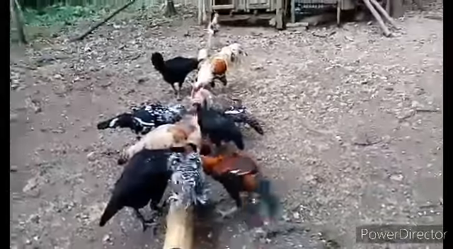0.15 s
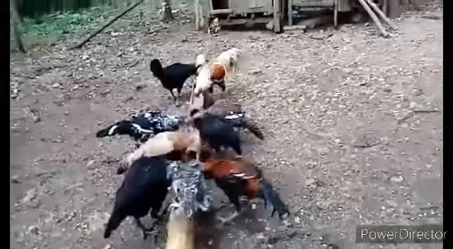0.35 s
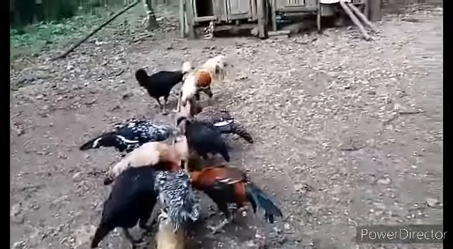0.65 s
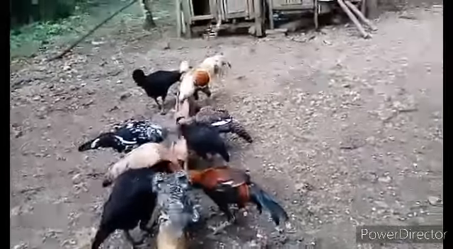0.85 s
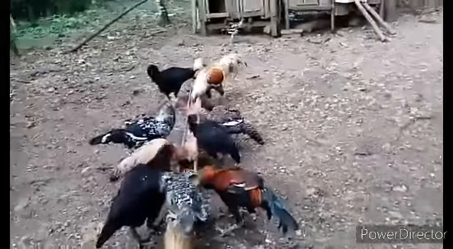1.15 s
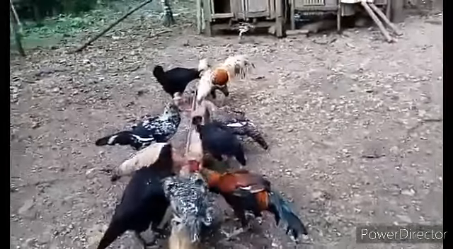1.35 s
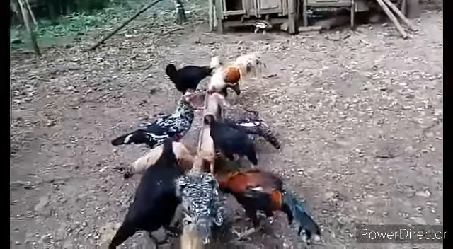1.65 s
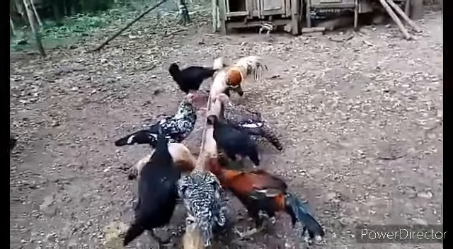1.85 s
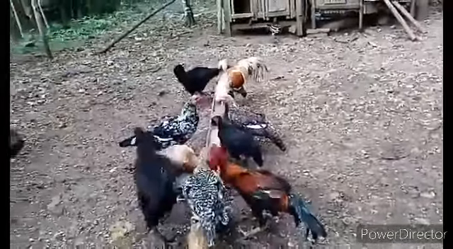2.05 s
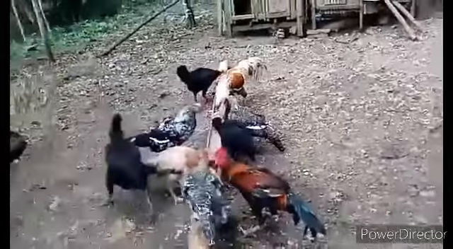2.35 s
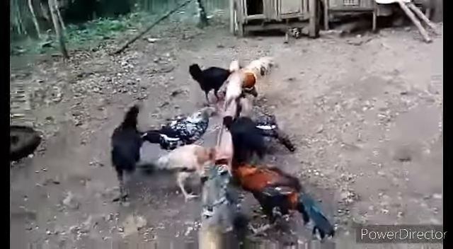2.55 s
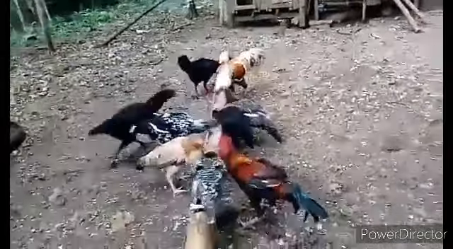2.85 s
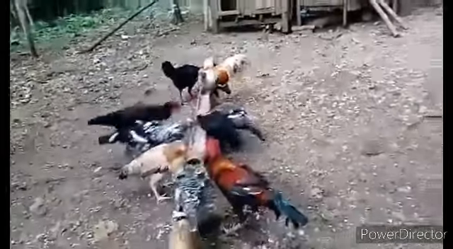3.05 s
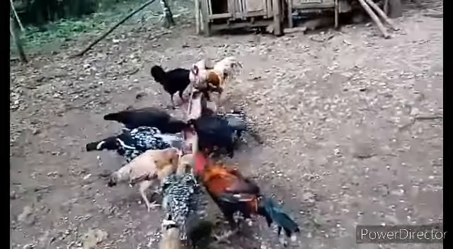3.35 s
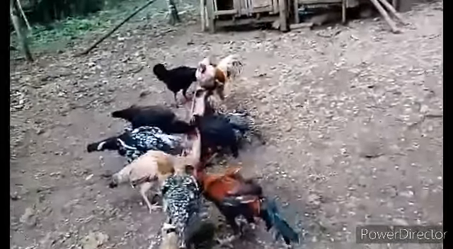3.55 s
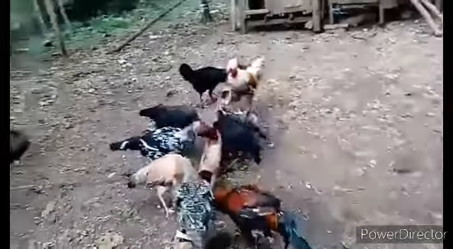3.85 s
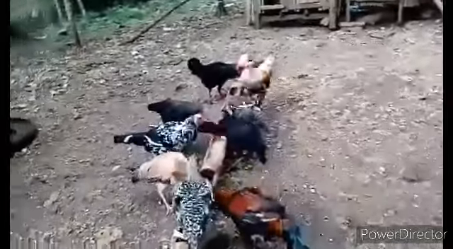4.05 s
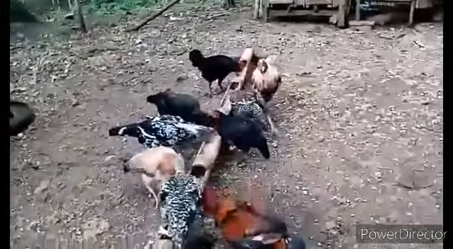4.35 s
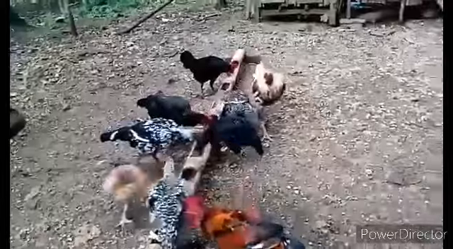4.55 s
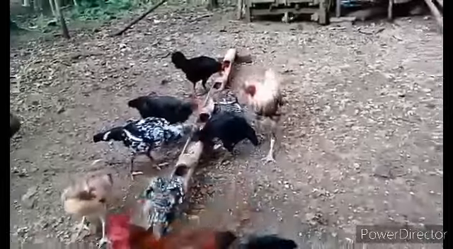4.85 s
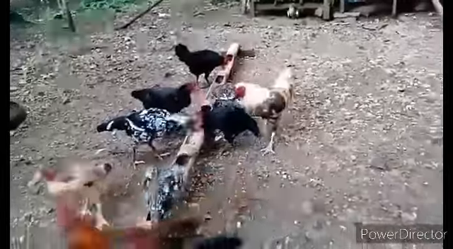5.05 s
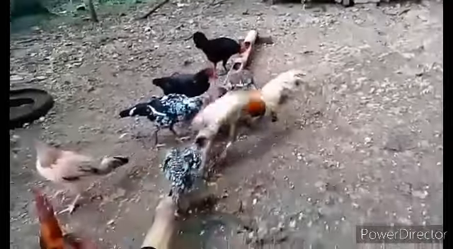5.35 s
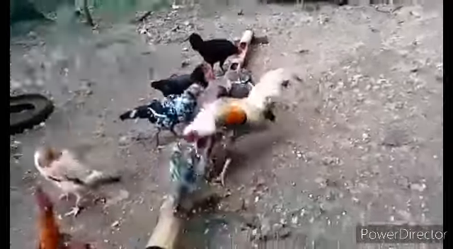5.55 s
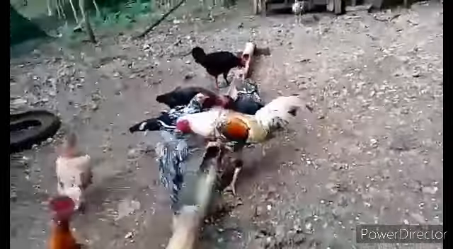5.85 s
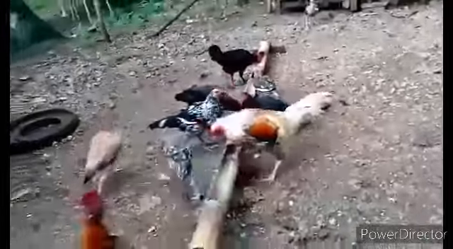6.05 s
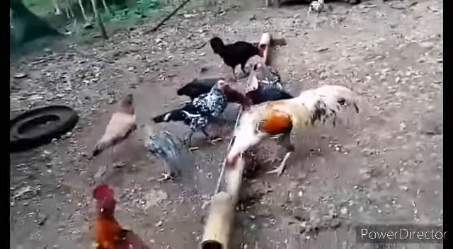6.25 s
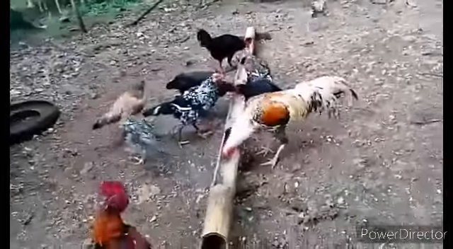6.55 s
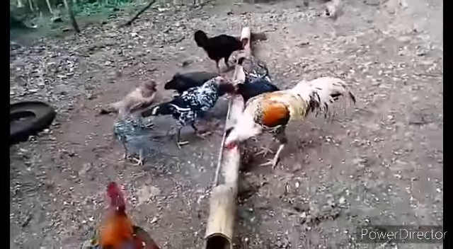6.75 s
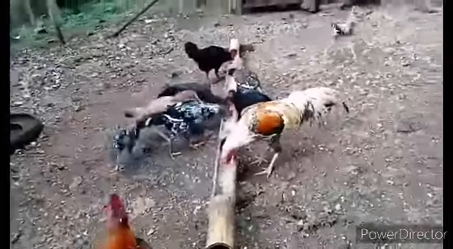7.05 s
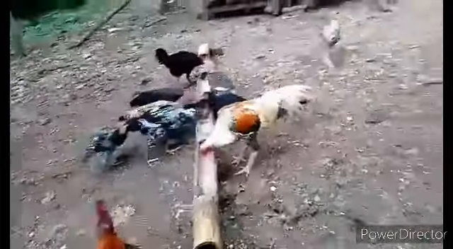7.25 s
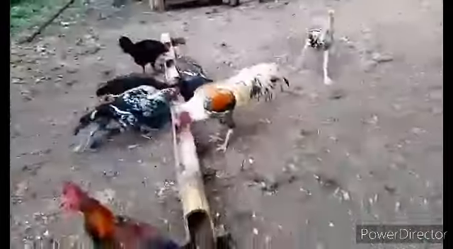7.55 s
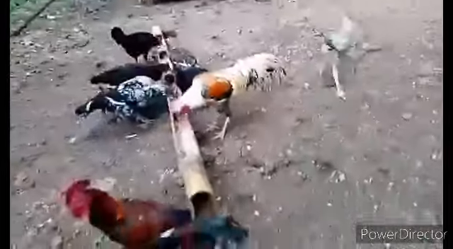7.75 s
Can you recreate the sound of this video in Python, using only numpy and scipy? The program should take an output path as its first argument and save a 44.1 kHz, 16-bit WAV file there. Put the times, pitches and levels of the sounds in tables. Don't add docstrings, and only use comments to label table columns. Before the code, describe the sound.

Irregular beak taps ring a bamboo tube in an open yard over a faint engine hum, with scattered kernels and a brief squawk late on.

```python
import sys
import numpy as np
from scipy import signal
from scipy.fft import rfft, irfft
from scipy.io import wavfile
from scipy.ndimage import uniform_filter1d

SR = 44100
rng = np.random.default_rng(int(sys.argv[2]) if len(sys.argv) > 2 else 0)


def unload_audio(sound):
    columns = np.transpose(np.atleast_2d(sound))
    steps = np.round(np.clip(columns, -1, 1) * 32767)
    wavfile.write(sys.argv[1], SR, steps.astype(np.int16))


def ratio_of_db(decibels):
    return 10 ** (np.asarray(decibels, float) / 20)


N = 347949
LEAD = 47
RIGHT_DB = 7.5


def evened(x):
    return x / np.sqrt(np.mean(x ** 2) + 1e-20)


def smooth(x, *sizes):
    for size in sizes:
        x = uniform_filter1d(x, size=size)
    return x


def read(points, hz):
    f, value = np.transpose(points)
    return np.interp(np.log(hz + 1), np.log(f + 1), value)


def add(mix, s, pair):
    for side, early in ((0, LEAD), (1, 0)):
        start = max(round(s * SR) - early, 0)
        part = mix[side, start:][:pair.shape[1]]
        part += pair[side, :len(part)]


# (frequency [Hz], level [dB])
AWAY_PORT = [(60, -10), (120, 4), (230, -8.5), (440, -6.5), (860, -6.5), (1680, -10), (3270, -15),
             (6370, -0.5), (12400, -3)]


def shade(x):
    hz = np.fft.rfftfreq(x.shape[-1], 1 / SR)
    return irfft(rfft(x) * ratio_of_db(read(AWAY_PORT, hz)), x.shape[-1])


# (frequency [Hz], likeness [0-1])
PORT_LIKENESS = [(100, 0.91), (500, 0.78), (1200, 0.14), (5000, 0.02)]


def wash(spectrum, patchy_db, flicker_db):
    frames, hz = N // 128 + 5, np.fft.rfftfreq(512, 1 / SR)
    a, b, c, d, patches = rng.standard_normal((frames, 257, 5)).T
    flicker = uniform_filter1d(patches[::-1], size=60, axis=0)
    flicker = evened(uniform_filter1d(flicker, size=3, axis=1))
    patches = uniform_filter1d(patches, size=6, axis=0)
    patches = evened(uniform_filter1d(patches, size=16, axis=1))

    same = np.clip(read(PORT_LIKENESS, hz), -1, 1)[:, None]
    right = a + 1j * b
    early = np.exp(2j * np.pi * hz * LEAD / SR)[:, None]
    left = same * right * early + np.sqrt(1 - same ** 2) * (c + 1j * d)
    left = left * ratio_of_db(read(AWAY_PORT, hz))[:, None]
    field_db = read(spectrum, hz)[:, None] + patchy_db * patches + flicker_db * flicker
    pair = signal.istft(np.array([left, right]) * ratio_of_db(field_db), nperseg=512, noverlap=384)[1]
    return pair[:, :N] / np.std(pair[1])


# (frequency [Hz], level [dB per Hz])
INSECT_WHINE = [(10500, -60), (11080, -15), (11340, 0.5), (11600, -10), (11900, -60)]


def insects():
    return ratio_of_db(-82.5 + RIGHT_DB) * wash(INSECT_WHINE, 2.0, 0.6)


# (multiple of 30.8 Hz, level [dB])
ENGINE_ORDERS = [(2, -90), (3, -82), (4, -71.5), (5, -75), (6, -78)]
# (frequency [Hz], level [dB per Hz])
ENGINE_RUMBLE = [(12, -62), (20, -33), (27, -31), (48, -23), (91, 12.5), (113, -1), (163, 12), (209, 25),
                 (300, -13), (390, -30), (660, -120)]
# (time [s], level [dB])
AIR_CARRY = [(0.0, -65.5), (0.81, -69), (1.08, -65.5), (1.89, -66), (2.15, -70.5), (3.38, -67),
             (3.76, -75.5), (4.02, -65), (4.37, -72), (5.07, -66.5), (5.78, -71.5), (5.91, -74.5),
             (7.01, -69.5), (7.36, -72.5), (7.69, -70), (7.89, -74.5)]


def engine():
    engine_hz, rumble_db, usual_carry_db = 30.8, -68, -67
    drift = evened(smooth(rng.standard_normal((N, 10)).T, 4000, 4000))
    k, db = np.transpose(ENGINE_ORDERS)[..., None]
    turns = np.cumsum(k * engine_hz * (1 + 0.017 * drift[:5]), 1) / SR
    hum = (ratio_of_db(db + 5.0 + 3.5 * drift[5:]) * np.sin(2 * np.pi * turns)).sum(0)
    rumble = wash(ENGINE_RUMBLE, 5.0, 1.4)
    carry_db = np.interp(np.arange(N) / SR, *np.transpose(AIR_CARRY)) - usual_carry_db
    return ratio_of_db(carry_db) * (ratio_of_db([[-4.0], [2.5]]) * hum + ratio_of_db(rumble_db) * rumble)


# (time [s], level [dB])
FLOCK_STIR = [(0.0, -67), (1.21, -68), (1.6, -71), (2.7, -64.5), (3.47, -69.5), (3.91, -65.5),
              (4.28, -73.5), (5.05, -62.5), (5.34, -69.5), (5.71, -57), (5.96, -71), (6.31, -70),
              (6.62, -68.5), (6.74, -84), (6.95, -66.5), (7.38, -72), (7.76, -63.5), (7.89, -67.5)]
# (frequency [Hz], level [dB per Hz])
FEATHER_RUSTLE = [(290, -70), (500, 2), (648, -8), (859, 1), (1200, -6), (1620, -2.5), (2990, 0.5),
                  (4720, -10.5), (5580, -8.5), (6000, -26), (7800, -48), (13200, -120)]
# (frequency [Hz], level [dB per Hz])
FOOT_SCUFF = [(110, -46), (180, 11), (247, 0.5), (349, 0), (800, -6), (1040, -52), (1760, -120)]
# (frequency [Hz], level [dB per Hz])
HUSK_HISS = [(2350, 5), (4000, 1.5), (5730, 5.5), (7030, -2), (8320, 0), (9500, -3), (10300, -8),
             (11000, 3.5), (11500, -34), (12200, -47), (15900, -62), (22000, -120)]
# (usual level [dB], rise [dB per dB of stir])
STIR_FOLLOW = [(-68, 0.84), (-77, 1), (-71.5, 0.19)]


def stir_db(s):
    return np.interp(s, *np.transpose(FLOCK_STIR)) + 68


def shuffle():
    stir = stir_db(np.arange(N) / SR)
    layers = wash(FEATHER_RUSTLE, 3.8, 2.5), wash(FOOT_SCUFF, 4.6, 3.6), wash(HUSK_HISS, 2.5, 1.2)
    return sum(ratio_of_db(db + slope * stir + RIGHT_DB) * x for (db, slope), x in zip(STIR_FOLLOW, layers))


# (time [s], length [s], level
# [dB], first pitch [Hz], last pitch [Hz])
SHORT_CALLS = [(0.858, 0.072, -80, 1780, 1850), (1.381, 0.03, -60.5, 1084, 1090),
               (1.423, 0.043, -67, 1126, 1090), (1.39, 0.089, -69.5, 852, 820),
               (2.456, 0.053, -58, 482, 557), (3.075, 0.028, -59.5, 602, 564),
               (3.36, 0.038, -56.5, 447, 498), (3.516, 0.054, -62.5, 423, 556),
               (3.23, 0.076, -71.5, 700, 715), (3.647, 0.028, -62, 525, 500),
               (3.795, 0.044, -55.5, 298, 431), (3.798, 0.082, -63, 646, 704),
               (5.111, 0.033, -59.5, 412, 423), (5.17, 0.027, -60, 406, 410),
               (5.329, 0.022, -55.5, 1620, 1566), (7.66, 0.026, -45, 1200, 1630),
               (7.694, 0.014, -47.5, 1500, 1525), (7.675, 0.035, -47, 1134, 1147),
               (7.693, 0.028, -51.5, 1130, 1040), (7.739, 0.012, -61.5, 1000, 1000)]


def clucks():
    octave_db = -13.5
    out = np.zeros((2, N))
    flutters = rng.standard_normal((len(SHORT_CALLS), 2, 5000))
    for (s, length, db, first_hz, last_hz), flutter in zip(SHORT_CALLS, flutters):
        u = np.linspace(0, 1, round(length * SR))
        wobble, tremble = evened(smooth(flutter, 200))[:, :len(u)]
        hz = first_hz + (last_hz - first_hz) * np.sin(np.pi * u / 2)
        turns = np.cumsum(hz * (1 + .022 * wobble)) / SR
        tone = np.sin(2 * np.pi * turns) + ratio_of_db(octave_db) * np.sin(4 * np.pi * turns)
        swell = ratio_of_db(db - 1.0 + RIGHT_DB + 2.54 * tremble) * np.sin(np.pi * u) ** 0.4
        add(out, s, swell * tone * ratio_of_db([[-6.0], [0]]))
    return out


def voice(s, effort_db, hz, rough, mouth, shut, wide):
    t = np.arange(s[0], s[-1], 1 / SR)
    effort_db, hz, rough, mouth = (np.interp(t, s, c) for c in (effort_db, hz, rough, mouth))
    rough, mouth = np.clip(rough, 0, 1), np.clip(mouth, 0, 1)
    wobble, air, other, *trembles = rng.standard_normal((len(t), 17)).T
    turns = np.cumsum(hz * (1 + 0.017 * evened(smooth(wobble, 150)))) / SR

    k = np.arange(1, 15)[:, None]
    tremble_db = 4.2 * evened(smooth(trembles, 120, 120))
    folds = (ratio_of_db(tremble_db) * np.cos(2 * np.pi * k * turns + 0.82 * k * k)).sum(0)
    folds *= 1 + 0.59 * rough * np.cos(np.pi * turns)
    puffs = (.5 + np.exp(-(turns % 1) / 0.47)) * np.array([other, air])
    drive = (1 - rough ** 1.3) * evened(folds) + .8 * rough ** 1.3 * evened(puffs)

    bins = np.fft.rfftfreq(len(t), 1 / SR)
    narrow, broad = (evened(irfft(rfft(drive) * ratio_of_db(read(throat, bins)), len(t))) for throat in (shut, wide))
    call = (1 - mouth) * narrow + mouth * broad
    call /= np.sqrt(smooth(call[1] ** 2, 500) + 1e-3)
    call[0] = shade(call[0])
    return ratio_of_db(effort_db + RIGHT_DB - 1.0) * call * signal.windows.tukey(len(t), .08)


# (time [s], effort [dB], pitch [Hz], roughness [0-1], mouth opening [0-1])
HEN_SQUAWKS = [
    [(5.555, -54, 442.5, 0.3, 0), (5.567, -44, 549, 0.3, 0.2), (5.578, -38, 595.6, 0.52, 0.2),
     (5.593, -37, 625, 0, 0.2), (5.617, -30.5, 616, 0.35, 1), (5.639, -29, 647.3, 0.49, 0.96),
     (5.651, -38, 592, 0.55, 0.65), (5.67, -38.5, 572, 0.42, 0.54), (5.697, -58, 490, 0.2, 0.2)],
    [(5.831, -59, 412, .3, 0), (5.841, -48, 509.6, 0.3, 0), (5.853, -41, 578, 0.72, 0.1),
     (5.868, -36.5, 608.4, 0.73, 0.38), (5.878, -38.5, 612, 0.54, 0.7), (5.888, -46, 599, 0.65, 0.2),
     (5.908, -44.5, 582, 0.4, 0.1), (5.917, -49, 520, 0.5, 0.4), (5.928, -59, 500, .7, .2)],
]
# (frequency [Hz], level [dB])
THROAT_SHUT = [(350, -40), (800, -5), (1150, 4), (1600, -10), (2250, 1.5), (2800, -21), (4500, -28),
               (11700, -64)]
# (frequency [Hz], level [dB])
THROAT_WIDE = [(350, -38), (620, -21.5), (1240, 3.5), (1550, 4), (1900, 3), (2450, -2), (3100, 1.5),
               (3750, -12), (4400, -17), (5500, -24), (6500, -41), (10000, -30.5), (12000, -75)]
# (delay [s], level [dB])
YARD_ECHOES = [(0.022, -7), (.043, -20), (.067, -14.5)]
# (time [s], level [dB], pitch [Hz])
CHICK_CHEEP = [(7.795, -75, 1030), (7.83, -67, 1060), (7.89, -66.5, 1070)]


def birds():
    out = np.zeros((2, N))
    for rows in HEN_SQUAWKS:
        call = voice(*np.transpose(rows), THROAT_SHUT, THROAT_WIDE)
        add(out, rows[0][0], call)
        for late_s, echo_db in YARD_ECHOES:
            add(out, rows[0][0] + late_s, ratio_of_db(echo_db) * np.diff(call))
    s, db, hz = np.transpose(CHICK_CHEEP)
    beak = [(800, -28.5), (1100, -12), (2100, -2.0), (3200, -3.5), (3600, -46)]  # (Hz, dB)
    add(out, s[0], voice(s, db + 9.5, hz, 0 * s + .36, 0 * s, beak, beak))
    return out


# (time [s], peak level [dB])
NAIL_TAP = (1.69024, -3.4)


def tap():
    s, db = NAIL_TAP
    t = np.arange(1500) / SR - .001
    late = np.maximum(t, 0)
    dent = -np.exp(-(t / .00005) ** 2)
    ring = -.6 * np.cos(2 * np.pi * 3500 * late) * np.exp(-late / .0004) * (1 - np.exp(-late / .0001))
    ring += 0.15 * np.sin(2 * np.pi * 1750 * (late - .0007)) * np.exp(-late / 0.0016) * (1 - np.exp(-late / 0.00016))
    ring += 0.058 * np.sin(2 * np.pi * 850 * (late - .0006)) * np.exp(-late / 0.0031) * (1 - np.exp(-late / .0005))
    rebound = 0.43 * np.exp(-((t - .0009) / 0.00045) ** 2) - 0.37 * np.exp(-((t - .0002) / 0.00021) ** 2)
    sway = -.13 * np.exp(-((t - .0028) / 0.0012) ** 2) + 0.0084 * np.exp(-((t - .008) / 0.0026) ** 2)
    out = np.zeros((2, N))
    add(out, s - .001, ratio_of_db(db) * (dent + ring + rebound + sway) * ratio_of_db([[-48], [0]]))
    return out


# (time [s], peak level [dB], tone [Hz])
FINGER_SHIFTS = [(0.337, -51, 160), (0.657, -52, 153), (1.012, -33.5, 183), (1.214, -26.5, 397),
                 (2.567, -46.5, 330), (6.362, -44.5, 350)]
# (time [s], peak level [dB], tone [Hz])
FOOT_KNOCKS = [(0.785, -44, 412), (1.313, -47.5, 478), (1.805, -51.5, 244), (2.34, -47.5, 243),
               (4.596, -46, 260), (4.647, -50.5, 460), (4.982, -48, 262), (5.747, -49.5, 184),
               (6.073, -46.5, 300), (6.39, -48, 380), (6.52, -52, 305), (0.824, -49.5, 260),
               (4.751, -53, 296), (7.448, -43, 283), (0.083, -51, 464), (0.245, -51, 354),
               (0.288, -49, 350), (0.434, -52.5, 400), (0.939, -43.5, 503), (1.523, -47.5, 296),
               (2.027, -53, 347), (2.943, -51, 403), (3.872, -53, 402), (3.957, -55, 350),
               (4.324, -54, 520), (4.457, -52, 380), (4.608, -48, 397), (6.229, -53, 400)]


def knocks():
    out, t = np.zeros((2, N)), np.arange(2000) / SR
    finger_pan_db, foot_pan_db = -35, -10.5
    pushes = [(*row, finger_pan_db) for row in FINGER_SHIFTS]
    pushes += [(*row, foot_pan_db) for row in FOOT_KNOCKS]
    for s, db, hz, pan_db in pushes:
        swing = -np.sin(2 * np.pi * hz * t) * (t / 0.0023) ** 2 * np.exp(-t / 0.001)
        ring = -.06 * np.sin(2 * np.pi * .8 * hz * t) * (1 - np.exp(-t / .003)) * ratio_of_db(-60 * t / .04)
        edge = 0.24 * np.sin(2 * np.pi * 2.24 * hz * t) * (t / 0.001) ** 2 * np.exp(-t / 0.00064)
        add(out, s, ratio_of_db(db + RIGHT_DB + 15.0) * (swing + ring + edge) * ratio_of_db([[pan_db], [0]]))
    return out


# (time [s], length [s], level [dB], centre [Hz], width [octaves])
GRAIN_SWEEPS = [(0.985, 0.13, -58.5, 2420, 0.38), (2.313, 0.085, -61, 1130, 1.4),
                (2.9, 0.079, -66.5, 6700, 0.76), (2.7, 0.075, -60, 1500, 0.72),
                (.229, 0.058, -61.5, 4900, 0.51), (0.11, 0.076, -71.5, 3100, 0.38),
                (3.4, 0.043, -69, 2100, 1.3), (4.4, 0.16, -75, 1100, 1.4), (8.1, 0.096, -62.5, 3400, 0.56),
                (1.525, 0.038, -54, 1900, .5), (6.99, 0.13, -66, 970, 0.47)]
# (time [s], length [s], level [dB])
CLAW_DRAGS = [(0.551, 0.1, -70), (0.728, 0.12, -68.5), (1.959, 0.13, -73.5), (2.503, 0.48, -72),
              (3.359, 0.13, -70), (4.733, 0.14, -68), (4.961, 0.1, -63.5), (6.052, 0.11, -69.5),
              (6.326, 0.25, -74), (7.636, 0.067, -67)]


def sweeps():
    out = np.zeros((2, N))
    strokes = GRAIN_SWEEPS + [(*row, 230, 1) for row in CLAW_DRAGS]
    grains = rng.standard_normal((len(strokes), 3, 9000))
    hz = np.fft.rfftfreq(9000, 1 / SR)
    for (s, length, db, centre_hz, octaves), grain in zip(strokes, grains):
        u = np.arange(9000) / SR / length
        colour = np.exp(-.5 * (np.log2((hz + 1) / centre_hz) / octaves) ** 2) / (1 + (hz / 9000) ** 8)
        band = evened(irfft(rfft(grain[:2]) * colour))
        clumps = ratio_of_db(4.5 * evened(smooth(grain[2], 110)))
        add(out, s, ratio_of_db(db + RIGHT_DB) * band * clumps * np.sin(np.pi * np.minimum(u, 1) ** 0.62))
    return np.array([shade(out[0]), out[1]])


# (time [s], peak level [dB], tone [Hz])
KERNEL_SKIPS = [(0.962, -48, 1600), (1.013, -47, 1000), (1.991, -57, 4500), (2.346, -55, 4600),
                (2.404, -59, 900), (2.489, -56, 900), (2.502, -54.5, 2780), (2.74, -53, 810),
                (2.751, -56, 955), (2.809, -44, 3620), (3.091, -60, 4600), (3.396, -57, 1500),
                (3.642, -63, 4500), (3.764, -47.5, 2520), (4.219, -62, 860), (4.652, -53, 4430),
                (4.941, -53.5, 3300), (5.057, -56, 4970), (5.079, -51, 4000), (5.126, -44, 3550),
                (5.176, -53, 860), (5.213, -55, 5000), (5.26, -39.5, 4360), (5.261, -54, 6000),
                (5.417, -51, 3700), (5.753, -56, 1000), (5.782, -52.5, 4000), (6.969, -54, 2000),
                (7.685, -63, 3700), (0.811, -50, 1010), (2.854, -54.5, 900), (4.121, -54.5, 900),
                (5.149, -50, 950), (7.155, -50, 1030), (7.553, -52.5, 4500), (5.058, -59, 1500),
                (0.578, -49, 4600)]


def skips():
    out, t = np.zeros((2, N)), np.arange(900) / SR
    for (s, db, hz), dice in zip(KERNEL_SKIPS, rng.random((len(KERNEL_SKIPS), 3))):
        span = 3.2 / hz * (hz / 1000) ** 0.88
        hump = (t / span) ** 2 * np.exp(2 - 2 * t / (0.32 * span)) / 0.086
        tone = np.sin(2 * np.pi * hz * t + 6 * dice[:2, None]) + 0.34 * np.sin(2 * np.pi * 1.39 * hz * t)
        land = hump * tone
        bounce = 0.43 * np.roll(land, round(120 + 200 * dice[2]), axis=1)
        add(out, s - 0.3 * span, ratio_of_db(db + RIGHT_DB) * (land + bounce))
    return np.array([shade(out[0]), out[1]])


# (time [s], peak level [dB], tube tone [Hz], wall tone [Hz], extra kernels [dB])
BARE_BLOWS = [(0.081, -27.5, 1790, 2570, 4), (0.244, -33, 940, 1710, -0.5), (0.402, -30, 934, 1780, 0.5),
              (0.984, -27, 2690, 2910, -1), (1.011, -33.5, 1980, 2370, -5), (1.116, -37, 2450, 3260, -6),
              (1.408, -41.5, 1410, 3120, -3), (1.528, -42, 1790, 2450, 8), (3.198, -36.5, 930, 2150, -4),
              (3.846, -38, 1140, 1730, -9), (5.259, -30, 1080, 1600, -2.5), (5.824, -40, 2730, 4440, -1),
              (7.63, -32.5, 1000, 3520, 0), (7.738, -46.5, 1000, 5480, -11.5), (0.26, -54, 2960, 5470, 3),
              (.543, -43, 1010, 2720, -4), (0.587, -48, 1400, 2430, -3), (5.271, -49, 990, 2350, -6),
              (5.086, -50, 1700, 2700, 0), (6.357, -58, 1500, 3000, -4)]
# (time [s], peak level [dB], tube tone [Hz], wall tone [Hz], hollow ring [dB])
THIN_FEED_BLOWS = [(0.575, -34.5, 1020, 1330, 4.5), (0.749, -32.5, 1050, 2140, 0.5),
                   (0.763, -30.5, 1290, 2450, -1), (0.942, -29, 1120, 2450, -10),
                   (1.106, -36.5, 1210, 1770, -0.5), (1.187, -44, 1060, 1970, -4),
                   (2.346, -40, 800, 1810, -3.5), (2.556, -44.5, 970, 2160, 0.1),
                   (2.638, -28.5, 1100, 2230, -4.5), (3.914, -38, 787, 2170, 3.5),
                   (4.075, -35, 920, 1200, 3.5), (4.441, -38.5, 930, 1814, -0.3),
                   (4.604, -30, 930, 1680, -4.5), (4.617, -36.5, 930, 1890, 5),
                   (4.807, -38.5, 930, 1440, -5), (4.874, -28.5, 1020, 1970, -2),
                   (5.073, -35, 1100, 3250, 0), (5.118, -39.5, 1080, 3570, -6),
                   (5.462, -26.5, 1110, 1990, -7), (7.134, -36.5, 980, 1330, 0.5),
                   (7.524, -41, 960, 1320, 3.5)]
# (time [s], peak level [dB], tube tone [Hz], wall tone [Hz], hollow ring [dB])
DEEP_FEED_BLOWS = [(0.278, -41, 1084, 1710, -0.5), (0.368, -39, 1010, 1680, -0.5),
                   (0.526, -34, 1050, 2350, 6), (0.691, -47, 1000, 2020, 4), (2.695, -30, 1360, 1875, 5),
                   (2.807, -31.5, 1064, 2440, 1.7), (2.923, -42, 930, 1730, 9),
                   (2.991, -33, 1030, 2100, 1.5), (3.35, -43, 840, 1920, 3.5), (3.641, -49.5, 960, 1720, 1),
                   (3.875, -41.5, 1320, 1420, 12), (4.024, -38.5, 1000, 1990, -4),
                   (4.259, -36, 860, 2920, -0.5), (4.555, -46, 800, 1710, 2.5),
                   (4.749, -45.5, 1100, 1400, 1), (5.504, -43, 875, 1400, 7),
                   (6.318, -47.5, 1020, 2700, -0.5), (6.378, -40, 1020, 2230, -2.5),
                   (6.627, -43.5, 953, 1910, -1.5), (6.94, -41, 920, 1840, 0.1),
                   (7.334, -40.5, 910, 1530, 3.7)]
# (time [s], peak level [dB])
BRIGHT_TOUCHES = [(0.55, -54), (2.05, -48.5), (2.6, -47), (2.958, -49.5), (3.434, -51), (5.147, -44),
                  (4.119, -55), (4.21, -53), (4.398, -68), (3.3, -51), (3.6, -82), (2.9, -65), (5, -53),
                  (1.655, -77), (4.476, -51), (4.651, -52), (5.036, -50), (6.4, -47), (5.173, -46.5),
                  (3.3, -66), (4.8, -56), (6.699, -55), (7.153, -50), (7.351, -54.5)]
# (time [s], peak level [dB])
MUFFLED_TOUCHES = [(0.011, -56.5), (0.952, -38.5), (3.155, -49), (3.26, -61), (4.33, -73), (.96, -52),
                   (6.058, -52.5), (6.493, -49.5), (6.593, -68), (6.932, -49), (5.535, -47), (6.968, -58),
                   (7.434, -48)]


def blows():
    far_count, far_db, far_spread_db = 50, -84, 6
    when, size = rng.random((far_count, 2)).T
    far = np.c_[when * N / SR, far_db + far_spread_db * (size - .5)]
    far[:, 1] += stir_db(far[:, 0])

    bright_hz, muffled_hz = (930, 2230), (930, 1600)
    kinds = [
        ([(*row, 0) for row in BARE_BLOWS], -7.5),
        ([(*row[:4], 0, row[4]) for row in THIN_FEED_BLOWS], -12.5),
        ([(*row[:4], 0, row[4]) for row in DEEP_FEED_BLOWS], -16),
        ([(*row, *bright_hz, 0, 0) for row in BRIGHT_TOUCHES], -10),
        ([(*row, *muffled_hz, 0, 0) for row in MUFFLED_TOUCHES], -26.5),
        ([(*row, *bright_hz, 0, 0) for row in far], -12.5)]
    kernels_db, kernels_lag = -9, 0.44
    return [(*row[:4], hard_db, row[4] + kernels_db - kernels_lag * (row[1] + 40), row[5])
            for rows, hard_db in kinds for row in rows]


# (frequency [Hz], level [dB])
WALL_MODES = [(1450, 1), (1900, 1), (2400, -2.5), (2900, -1.5), (3400, -1), (3900, -4), (4600, -9.5),
              (5300, -8), (6200, -15), (7500, -71), (9200, -19)]


def pecks():
    out, t = np.zeros((2, N)), np.arange(4096) / SR
    rows = blows()
    chance = rng.standard_normal((len(rows), 4, 16))
    kernels = rng.standard_normal((len(rows), 4, len(t)))
    wall_hz, wall_db = np.transpose(WALL_MODES)
    slot = signal.butter(4, [620, 9000], "band", fs=SR, output="sos")
    for (s, db, tube_hz, tone_hz, hard_db, kernel_db, hollow_db), dice, grit in zip(rows, chance, kernels):
        hz = np.r_[tube_hz, tone_hz, wall_hz * (1 + .06 * dice[0, :len(wall_hz)])]
        lift_db = (hard_db + 13.0) * np.clip(np.log2(hz / 1700), -.6, 1.6)
        mode_db = np.r_[4.0 + hollow_db, 3.5, wall_db] + lift_db
        mode_db = mode_db + 1.2 * dice[1, :len(hz)]
        t60 = 0.02 * (hz / 1000) ** -.6 * np.exp(0.021 * dice[2, -1])
        fade = ratio_of_db(-60 * t / t60[:, None]) + 1.6 * np.exp(-t / .0005)
        turn = np.array([1.05 * dice[3, :len(hz)], 0 * hz])[..., None]
        rings = ratio_of_db(mode_db[:, None]) * fade * np.sin(2 * np.pi * hz[:, None] * t + turn)
        rings *= (1 - np.exp(-t / 0.0004)) ** 2

        crunch = 0.04 * grit[2] ** 3 * (t / .001) ** 2 * np.exp(-t / 0.0008)
        crunch[60] = 1
        knock = signal.fftconvolve(rings.sum(1), crunch[None], axes=1)[:, :len(t)]

        bounces = ratio_of_db(2.5 * evened(smooth(grit[3], 90)))
        rattle = signal.fftconvolve(rings[:, :, :120].sum(1), grit[:2], axes=1)[:, :len(t)]
        rattle = evened(rattle) * bounces * ratio_of_db(kernel_db - 60 * t / 0.078) * (1 - np.exp(-t / 0.0023))
        both = signal.sosfilt(slot, knock / abs(knock[1]).max() + rattle)
        add(out, s - .001, ratio_of_db(db + RIGHT_DB) * both)
    return np.array([shade(out[0]), out[1]])


def scene():
    background = insects() + engine() + shuffle()
    calls = clucks() + birds()
    handling = tap() + knocks()
    return background + calls + handling + sweeps() + skips() + pecks()


# (frequency [Hz], level [dB])
TREBLE_BAR = [(3500, -20), (4700, -3), (5700, -7), (7000, 1.5), (9200, -5), (10300, 8), (11300, -8),
              (11800, -4), (12400, 32)]


def starve(x):
    hz, _, z = signal.stft(x, SR, nperseg=1024)
    centre_hz = hz[6::12, None]
    band_db = 10 * np.log10(np.add.reduceat(abs(z) ** 2, np.arange(0, 513, 12), axis=1) + 1e-16)
    busy_db = 0.13 * np.maximum(band_db.max(1, keepdims=True) + 60.0, 0)
    whim = uniform_filter1d(smooth(rng.standard_normal(band_db.shape), 5), size=2, axis=1)
    bar_db = np.median(band_db, 2, keepdims=True) + read(TREBLE_BAR, centre_hz) + busy_db
    bar_db = bar_db + 3.5 * evened(whim)
    short_db = np.clip(bar_db - smooth(band_db, 2), -30, 30)
    kept = 1 / (1 + np.exp(short_db / .5))
    kept = np.where(centre_hz < 3500, 1, kept)
    return signal.istft(z * np.repeat(kept, 12, axis=1)[:, :513], SR, nperseg=1024)[1][:, :N]


def top_cut(x):
    return signal.sosfilt(signal.butter(12, 13000, fs=SR, output="sos"), x)


def record(dry):
    bass_cut = signal.butter(2, 54, "high", fs=SR, output="sos")
    mix = starve(signal.sosfilt(bass_cut, dry))
    return top_cut(mix)


dry = scene()
out = record(dry)
unload_audio(out)
```